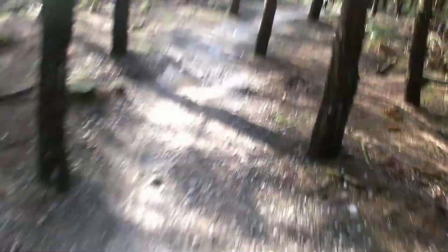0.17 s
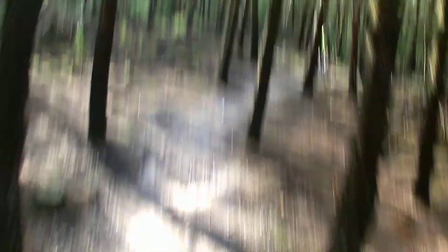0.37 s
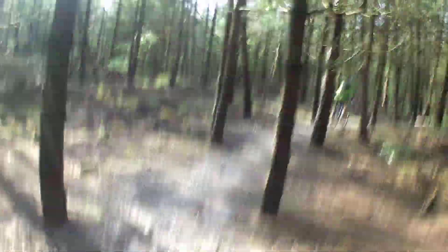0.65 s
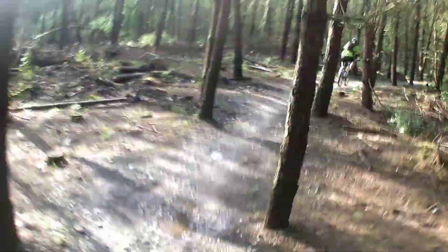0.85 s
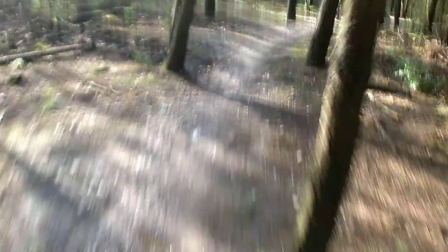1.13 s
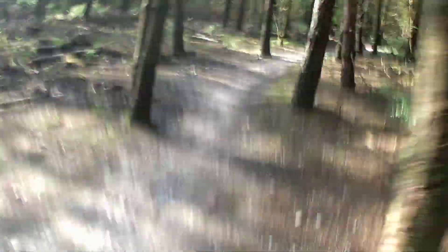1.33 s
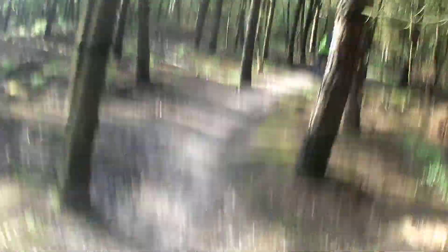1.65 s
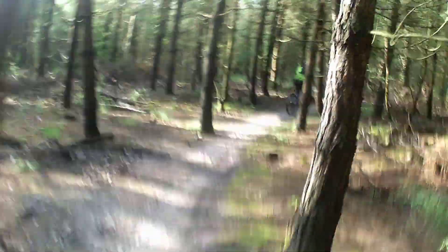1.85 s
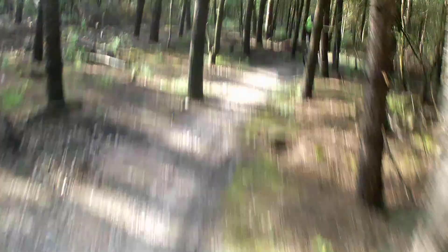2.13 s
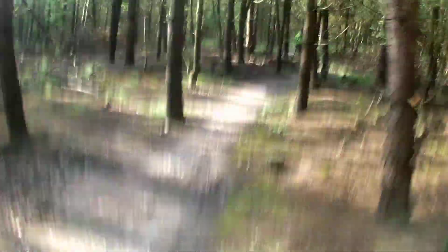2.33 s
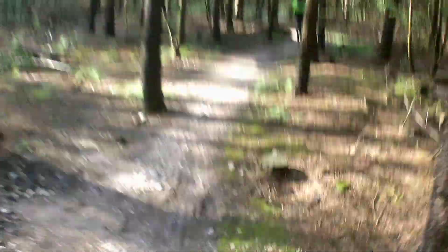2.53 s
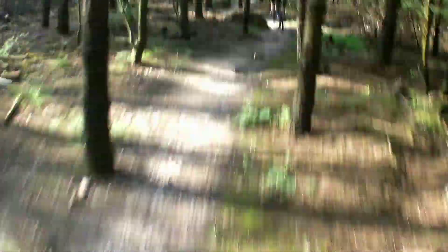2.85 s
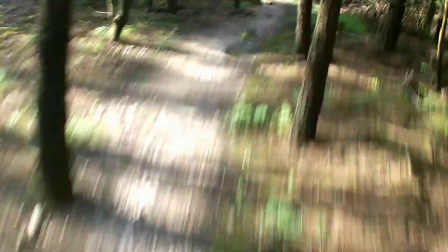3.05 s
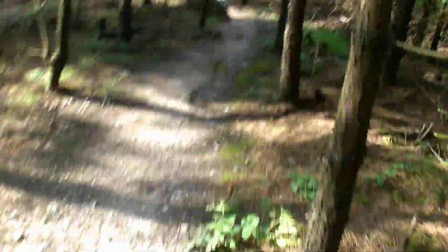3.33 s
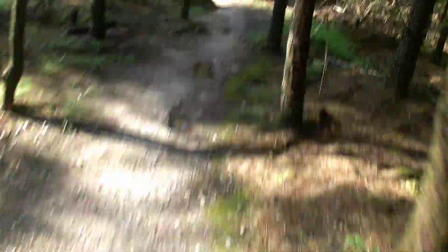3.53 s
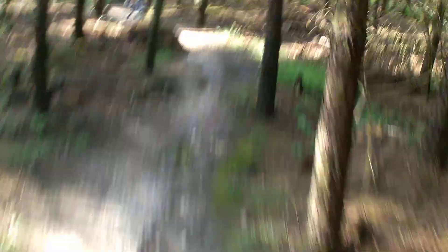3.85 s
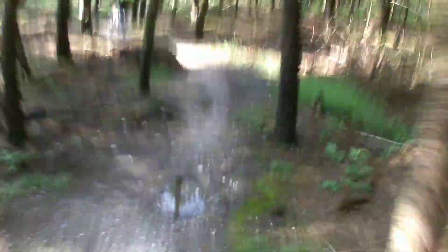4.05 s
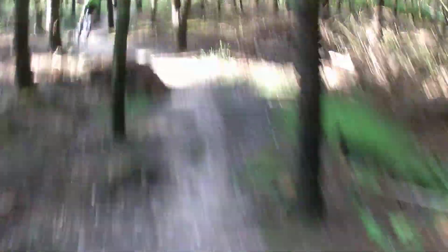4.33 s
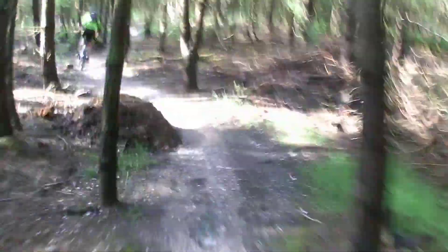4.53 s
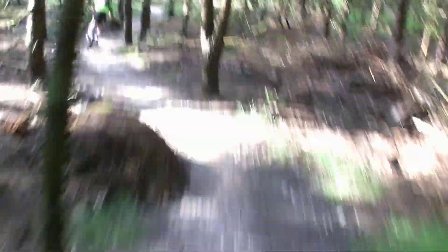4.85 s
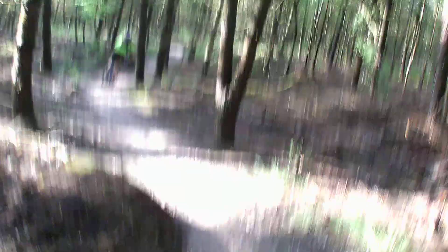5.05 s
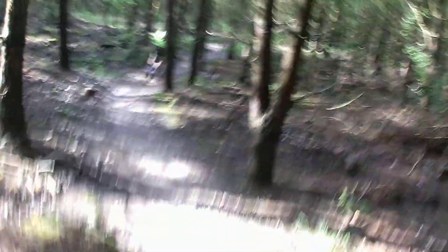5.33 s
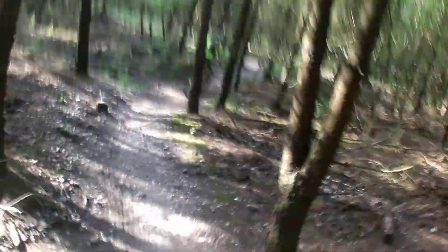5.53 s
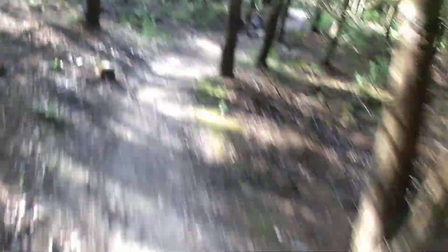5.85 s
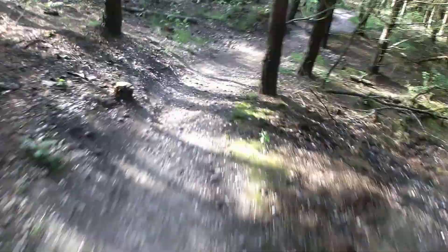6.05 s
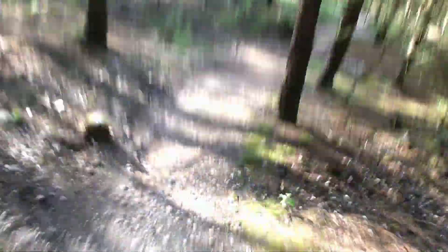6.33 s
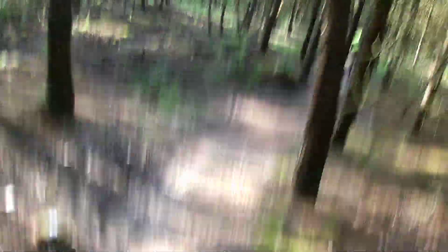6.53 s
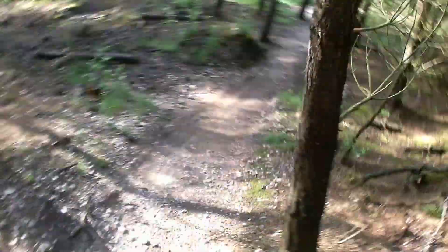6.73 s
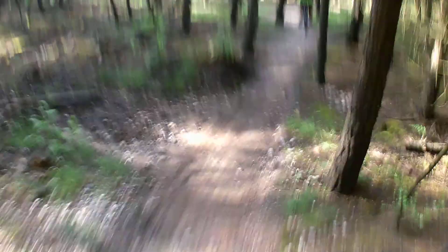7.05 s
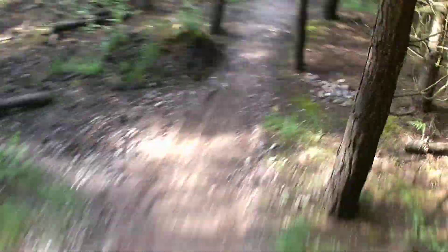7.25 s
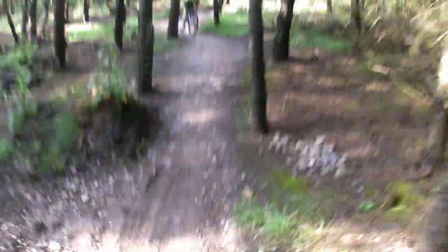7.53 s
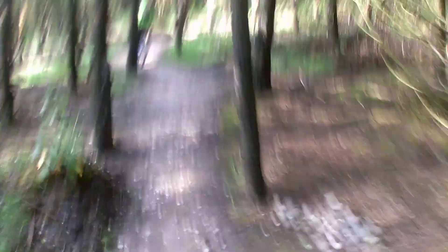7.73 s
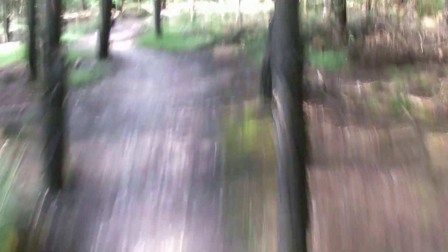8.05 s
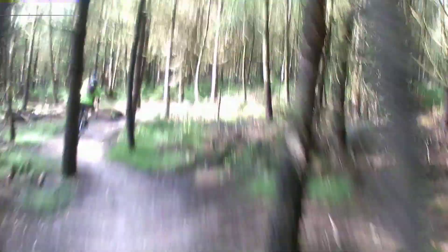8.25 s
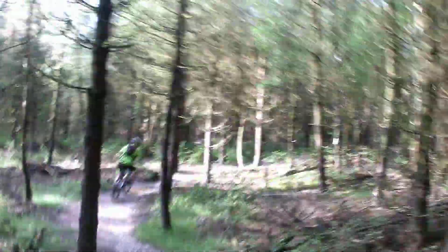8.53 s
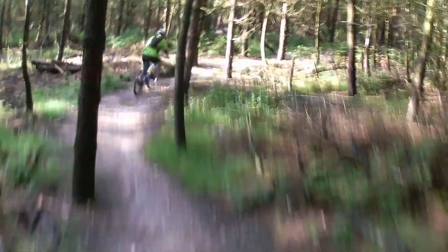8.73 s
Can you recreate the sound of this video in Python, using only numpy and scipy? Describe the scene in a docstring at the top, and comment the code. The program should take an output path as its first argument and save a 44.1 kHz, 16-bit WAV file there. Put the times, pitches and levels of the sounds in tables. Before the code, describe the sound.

Dry plastic clacks and low, wobbling thumps in irregular bursts from a bike-mounted camera on a bumpy dirt path, over faint tyre shudder and hiss.

```python
"""A small camera in a plastic case rides on the mount of a mountain bike over a rough trail, for 9 s.
It opens in a volley of knocks: shell and lid ring briefly, the mount wobbles low, the rig lurches.
From about 1 s the knocks come further apart; after 5.5 s they crowd in again up to the hard end.
Filtered random impacts give the tyre shudder throughout, shaped noise the microphone hiss. Faint
freewheel ticks, rung by a train of clicks, are strongest around 8 s."""
import sys
import numpy as np
from scipy import signal
from scipy.fft import rfft, irfft
from scipy.io import wavfile

SR = 44100
rng = np.random.default_rng(int(sys.argv[2]) if len(sys.argv) > 2 else 0)


def store_wav(level_fs):
    """Save 16-bit WAV to argv[1]."""
    pcm = np.round(np.clip(np.atleast_2d(level_fs), -1, 1) * 32767)
    wavfile.write(sys.argv[1], SR, pcm.T.astype(np.int16))


N = 392049

# case hits clamp: start_s, shell_db, lid_db, wobble_db (strengths of the blow on each part), wobble_hz
CLAMP_KNOCKS = [(0.0653, -47, -64, -21, 108), (0.0702, -40, -52, -15, 164), (0.0856, -32, -46, -17.5, 123),
                (.0923, -16, -27.5, -6.5, 147), (0.1287, -48, -63, -26, 100), (.1464, -19, -28, -7.5, 166),
                (0.1575, -27, -25.5, -7, 207), (0.1663, -44, -35, -12.5, 183),
                (0.3424, -56, -69, -27.5, 149), (0.4618, -42.5, -68.5, -23, 172),
                (0.5016, -47, -66, -23.5, 185), (.5733, -44, -53, -25.5, 209), (0.5792, -47, -40, -48, 150),
                (0.6014, -23.5, -31.5, -9, 170), (0.6388, -43, -63, -19.5, 127), (.652, -37, -53, -48, 150),
                (0.7188, -22.5, -60, -15.5, 220), (0.7272, -24, -23, -12, 197),
                (0.7948, -65, -72, -21, 140), (0.8256, -25, -34.5, -14.5, 174),
                (0.9391, -42.5, -63, -26, 168), (0.9517, -52, -62, -18.5, 185.5),
                (0.9649, -46, -45.5, -36, 148), (.9867, -55, -44, -31.5, 164), (1.1261, -57, -47, -48, 122),
                (1.1635, -24, -32, -18.5, 154), (1.18, -40, -55, -21.5, 160),
                (1.3665, -22.5, -32, -10.5, 188), (1.588, -28, -38.5, -16, 172.5),
                (1.7019, -22.5, -31.5, -17, 229), (1.7164, -46, -56, -24, 193),
                (1.728, -58, -56, -21.5, 194), (1.7794, -46.5, -65, -21.5, 117),
                (1.9365, -21.5, -30.5, -9, 188), (2.105, -72, -74, -27, 140),
                (2.1252, -34.5, -47.5, -21.5, 176), (2.2328, -64, -75, -24.5, 99),
                (2.2512, -21, -31.5, -9, 183.5), (2.3262, -45, -53, -20.5, 131),
                (2.3566, -42, -42, -19.5, 117), (2.3721, -21.5, -30, -9, 186), (2.5147, -62, -66, -19, 132),
                (2.5188, -49, -54, -17.5, 110), (2.5259, -43.5, -54, -21, 115),
                (2.5591, -35.5, -49.5, -21.5, 170), (2.9415, -43, -48, -37, 114),
                (2.972, -40, -46.5, -20.5, 117), (3.0154, -25, -36.5, -14.5, 205),
                (3.0983, -58, -70, -30, 141), (3.125, -53, -72, -26, 162), (3.218, -61, -69, -27, 169),
                (3.2388, -56, -63.5, -26, 162), (3.251, -50, -66, -57, 130),
                (3.746, -46.5, -41, -33.5, 184), (3.7929, -26, -36, -15, 185), (3.934, -59, -68, -31, 133),
                (3.955, -50, -60, -27, 164), (4.0914, -53, -52, -35, 174), (4.244, -51, -52, -34.5, 128),
                (4.2627, -40, -50.5, -21.5, 172), (4.562, -71.5, -82, -32, 150),
                (4.6133, -49, -44, -38, 187), (5.098, -51, -59.5, -34, 147), (5.1206, -26, -35.5, -13, 167),
                (5.319, -60, -72, -29.5, 147), (5.378, -23, -33, -12.5, 173.4),
                (5.539, -54.5, -61, -12, 143.6), (5.619, -28, -37, -16.5, 165),
                (5.6405, -48, -46, -37, 176), (5.6954, -52.5, -61, -20, 137), (5.7179, -44, -49, -28, 116),
                (5.74, -20, -28.5, -8.5, 167), (5.756, -66, -71, -17, 194.5),
                (5.9693, -56, -65.5, -31.5, 159), (5.9914, -56, -62, -30, 140),
                (6.0444, -31.5, -24, -14.5, 170), (6.0474, -18, -32, -7, 172), (6.063, -47, -57, -18, 193),
                (6.085, -44.5, -62, -28, 169), (6.203, -51, -67.5, -26, 138), (6.219, -49, -54, -26, 109),
                (6.2323, -33.5, -39.5, -17.5, 141), (6.3134, -30, -41, -19.5, 177),
                (6.472, -55.5, -64, -32.5, 138), (6.576, -62, -63, -27, 181), (6.5924, -20, -26, -9, 213),
                (6.601, -42, -42, -14, 199), (6.617, -45, -45, -32, 180), (6.629, -57, -62, -24, 102),
                (6.7232, -58, -70, -31.5, 139), (6.77, -59, -64, -34.5, 179),
                (6.8035, -56, -62, -32.5, 167), (7.0513, -51, -72, -30.5, 144), (7.0883, -52, -58, -24, 96),
                (7.1025, -20, -28, -12.5, 183), (7.156, -64, -78, -18.5, 138),
                (7.2128, -27, -39, -13.5, 192), (7.335, -48.5, -63, -20.5, 146),
                (7.35, -38.5, -45, -21.5, 117), (7.3867, -22, -30, -14.5, 186),
                (7.4415, -48, -51, -28, 155), (7.4563, -39, -35.5, -19.5, 112),
                (7.5324, -29.5, -40.5, -16.5, 173), (7.583, -58, -57, -33, 142),
                (7.7507, -48, -48, -29, 140), (7.82, -21.5, -32.5, -9.5, 192), (7.879, -54, -59, -37, 180),
                (7.913, -61, -73, -28, 135), (7.9746, -46.5, -47.5, -31, 168),
                (8.025, -19, -27.5, -13, 138), (8.045, -58, -71, -12, 195), (8.1372, -67, -70.5, -23, 154),
                (8.171, -57, -68, -22, 155), (8.3451, -55, -49.5, -33, 181),
                (8.4627, -29.5, -37, -17.5, 163), (8.5537, -67, -74, -23.5, 127),
                (8.5972, -36, -48, -20.5, 171), (8.63, -50, -60.5, -26.5, 151), (8.66, -45, -52, -35, 150),
                (8.6676, -16, -22, -11, 126), (8.7163, -58, -66, -23, 104), (8.7316, -13.5, -29, -5, 138),
                (8.739, -19.5, -21, -2.5, 235.7), (8.761, -51, -48, -18, 185),
                (8.794, -49.5, -46, -32, 141)]
# modes of the case shell: pitch_hz, relative_db, t60_s
SHELL_MODES = [(312, 2.5, 0.011), (583, -0.5, 0.01), (855, 2, 0.015), (1181, 1, 0.017), (1565, -6, 0.027),
               (1950, -47, 0.0053)]
# modes of the case lid: pitch_hz, relative_db, t60_s
LID_MODES = [(2520, 1, .017), (2740, 1, .019), (3260, -17, .016), (3680, -17, .02)]

HARD_DB = -32   # a shell level above this is a hard blow: it ticks and bounces


def from_db(db):
    """Decibels to amplitude."""
    return 10 ** (np.asarray(db) / 20)


def rms_one(x):
    """Scale a signal to rms 1."""
    return x / np.sqrt(np.mean(x ** 2) + 1e-20)


def filtered(x, order, hz, kind):
    """Butterworth filter: "low", "high" or "band"."""
    return signal.sosfilt(signal.butter(order, hz, kind, fs=SR, output="sos"), x)


def drift(rate_hz):
    """Slow chance: noise through a double one-pole low-pass, spread 1."""
    r = np.exp(-2 * np.pi * rate_hz / SR)
    noise = rng.standard_normal(N + SR)
    settled = signal.lfilter([1], [1, -2 * r, r * r], noise)[SR:]
    return rms_one(settled)


def ring(force, hz, t60_s):
    """A resonator: a unit click sets a decaying sine of height 1 ringing."""
    r = from_db(-60 / (t60_s * SR))
    w = 2 * np.pi * hz / SR
    return signal.lfilter([0, np.sin(w)], [1, -2 * r * np.cos(w), r * r], force + 1e-18)


def body(force, modes):
    """All modes of one part driven by the same force; neighbours move in opposite phase."""
    return sum((-1) ** k * from_db(level_db) * ring(force, hz, t60_s)
               for k, (hz, level_db, t60_s) in enumerate(modes))


def clicks(times_s, size):
    """A train with one impulse at each time."""
    out = np.zeros(N)
    at = np.clip((np.asarray(times_s) * SR).astype(int), 0, N - 1)
    np.add.at(out, at, size)
    return out


def click_fade(times_s, level_db, t60_s):
    """Exponential envelopes that start at each time and add where they overlap."""
    fade = from_db(-60 / (t60_s * SR))
    return signal.lfilter([1], [1, -fade], clicks(times_s, from_db(level_db)))


def grains(per_s, spread_db):
    """Random tiny impacts of uneven size and sign; rms 1."""
    size = from_db(spread_db * np.minimum(rng.exponential(1, N), 5))
    sign = rng.choice([-1, 1], N)
    lands = rng.random(N) < per_s / SR
    return rms_one(size * sign * lands)


def knocks():
    """Shell and lid ring at fixed modes; the mount's wobble pitch depends on how the clamp is loaded."""
    start_s, shell_db, lid_db, wobble_db, wobble_hz = all_blows()
    shell = struck(start_s, shell_db, SHELL_MODES, chatter_db=-27.5, mode_factor=0.92)
    shell = filtered(shell, 4, 1970, "low")   # plastic contact is soft
    # the opposed pair beats: it swells after the blow
    lid = struck(start_s, lid_db, LID_MODES, chatter_db=-30.5, mode_factor=-1.043)
    lid = filtered(lid, 2, [2250, 4300], "band")
    mount = mount_wobble(start_s, shell_db, wobble_db, wobble_hz)
    return shell + lid + filtered(mount, 2, 1700, "low")


def all_blows():
    """The listed knocks, a bounce with hardly any push after each hard one, a light nudge near every knock."""
    BOUNCE_S, BOUNCE_SHELL_DB, BOUNCE_LID_DB, BOUNCE_WOBBLE_DB = 0.019, -33.5, -21, -60   # against the blow
    NUDGE_MAX_DB, NUDGE_SPREAD_DB = -35.5, 5.5   # ceiling of the middle wobble level, and spread around it
    NUDGE_SHELL_DB, NUDGE_LID_DB = -20, -32.5   # against the nudge's wobble
    NUDGE_HZ, NUDGE_WITHIN_S = 153.6, .03   # middle wobble pitch; spread around the knock's time

    rows = np.array(CLAMP_KNOCKS)
    hard = rows[rows[:, 1] > HARD_DB]
    uneven = rng.normal(0, 1, (len(hard), 3)) * [.003, 3, 3]   # spread: s, shell dB, lid dB
    bounces = hard.copy()
    bounces[:, :3] += uneven + [BOUNCE_S, BOUNCE_SHELL_DB, BOUNCE_LID_DB]
    bounces[:, 3] += BOUNCE_WOBBLE_DB

    chance = rng.normal(0, 1, (len(rows), 5))
    start_s = np.abs(rows[:, 0] + NUDGE_WITHIN_S * chance[:, 4])
    push_db = np.minimum(NUDGE_MAX_DB, rows[:, 3] - 8) + NUDGE_SPREAD_DB * chance[:, 0]
    shell_db = push_db + NUDGE_SHELL_DB + 4 * chance[:, 1]
    lid_db = push_db + NUDGE_LID_DB + 6 * chance[:, 2]
    wobble_hz = NUDGE_HZ * (1 + .18 * chance[:, 3])
    nudges = np.c_[start_s, shell_db, lid_db, push_db, wobble_hz]
    return np.vstack([rows, bounces, nudges]).T


def struck(times_s, blow_db, modes, chatter_db, mode_factor):
    """Each blow meets every mode with a strength of its own, then the loose fit chatters on for a moment."""
    VARY_DB, CHATTER_T60_S = 1.5, 0.045   # spread of mode strengths between hard blows; chatter decay

    # light blows land anywhere: more varied colour
    glancing = np.clip((-25 - blow_db) / 10, 1, 3.5)[:, None]
    vary_db = glancing * rng.normal(0, VARY_DB, (len(times_s), len(modes)))
    out = np.zeros(N)
    for k, (hz, level_db, t60_s) in enumerate(modes):
        force = clicks(times_s, from_db(blow_db + level_db + vary_db[:, k]))
        out += mode_factor ** k * ring(force, hz, t60_s)

    loose = from_db(chatter_db) * click_fade(times_s, blow_db, CHATTER_T60_S)
    for mode in modes:   # every mode picks up its own small contacts
        out += body(loose * grains(600, 3.1), [mode])
    return out


def mount_wobble(start_s, shell_db, wobble_db, wobble_hz):
    """Each push sets off a decaying low sine, less one smooth recoil pulse."""
    WOBBLE_T60_S, WOBBLE_RISE_S = 0.069, 0.00072   # decay; shortest rise
    RECOIL_DB, RECOIL_S = -9.5, 0.0019   # peak against the wobble, before the rise; time of that peak

    mount, t = np.zeros(N), np.arange(SR // 8) / SR
    # a push without a crack starts slowly
    rise_s = WOBBLE_RISE_S * from_db(np.clip(wobble_db - shell_db - 25.0, 0, 16))
    # the case is thrown back once
    recoil = from_db(RECOIL_DB) * t / RECOIL_S * np.exp(1 - t / RECOIL_S)
    for at, level_db, hz, slow_s in zip((start_s * SR).astype(int), wobble_db, wobble_hz, rise_s):
        swing = from_db(-60 * t / WOBBLE_T60_S) * np.sin(2 * np.pi * hz * t + 0.48)
        wobble = (1 - np.exp(-t / slow_s)) * (swing - recoil)
        mount[at:at + len(t)] += from_db(level_db) * wobble[:N - at]
    return mount


def snaps():
    """Millisecond scrapes of bright noise that also ring the hard edge."""
    # the hardest edge-on contacts, a bright tick: start_s, level_db (of the noise, before the high-pass)
    edge_contacts = [(.0933, -32.5), (0.1565, -40), (0.168, -46), (0.7285, -42), (0.736, -49),
                     (3.7926, -51), (5.378, -55), (6.045, -42.5), (6.0833, -49.5), (6.5914, -40),
                     (6.602, -53), (6.613, -43.5), (8.0346, -50), (8.0495, -54), (8.7302, -51),
                     (8.7402, -25.5), (8.7481, -22), (8.7563, -52), (8.7617, -46)]
    # modes of the hard edge: pitch_hz, relative_db, t60_s
    edge_modes = [(3820, 4.5, 0.015), (4860, 4.5, 0.0087), (7020, -16, 0.032), (9060, -24, 0.012)]
    TICK_DELAY_S, TICK_DB = 0.0017, -31   # tick after each hard knock, level against its shell level

    ticks = [(start_s + TICK_DELAY_S, shell_db + TICK_DB)
             for start_s, shell_db, *_ in CLAMP_KNOCKS if shell_db > HARD_DB]
    start_s, level_db = np.vstack([edge_contacts, ticks]).T
    burst = click_fade(start_s, level_db, 0.0069) * rng.standard_normal(N)
    edge = from_db(-17.5) * body(burst, edge_modes)
    return filtered(burst + edge, 2, 3400, "high")


def jolts():
    """The rig lurches: one soft swing out and back, a low cosine under a bell curve centred on the bump."""
    # lurches on bumps: centre_s, level_db, swing_hz, length_s (from the centre until 53 dB down)
    lurches = [(0.058, -38, 27, 0.028), (0.179, -20.5, 49, 0.047), (.386, -40, 15, 0.021),
               (0.472, -36, 30, 0.025), (0.537, -31, 23, .053), (0.663, -35, 75, 0.056),
               (0.752, -25, 46, .014), (0.879, -32, 33, .021), (0.981, -21.5, 32, 0.025),
               (1.123, -34, 42, 0.012), (1.191, -18.5, 32, 0.033), (1.415, -27.5, 44, 0.042),
               (1.525, -42, 39, 0.021), (1.733, -17, 43, 0.031), (1.976, -26.5, 43, 0.028),
               (2.203, -37, 28, 0.012), (2.411, -25, 40, 0.044), (2.625, -28.5, 28, 0.018),
               (2.826, -34.5, 24, 0.056), (2.943, -34, 47, 0.01), (3.06, -34, 50, .041),
               (3.253, -24.5, 44, .042), (3.528, -38, 21, 0.034), (3.646, -38, 38, 0.011),
               (3.714, -37, 35, .031), (3.749, -33, 72, .016), (3.991, -40, 39, .032),
               (4.132, -32.5, 30, 0.0075), (4.194, -39, 26, .021), (4.514, -39, 37, 0.022),
               (4.615, -41, 27, 0.019), (4.833, -34, 16, 0.024), (5.155, -36, 23, 0.018),
               (5.27, -35.5, 14, 0.049), (5.415, -27.5, 30, 0.046), (5.778, -24.5, 33, 0.027),
               (5.985, -35, 84, 0.025), (6.031, -31.5, 120, .016), (6.071, -17, 34, 0.031),
               (6.355, -36, 26, .024), (6.518, -32.5, 30, 0.03), (6.617, -14, 54, 0.035),
               (6.665, -30, 46, 0.014), (6.83, -35.5, 27, 0.04), (6.955, -34.5, 24, 0.012),
               (7.125, -24, 35, .025), (7.183, -30, 18, 0.012), (7.239, -27, 29, .022),
               (7.354, -31, 56, 0.037), (7.417, -25.5, 35, 0.033), (7.616, -29, 21, 0.019),
               (7.855, -22, 33, 0.021), (7.95, -39, 24, 0.013), (7.97, -27.5, 52, 0.014),
               (8.047, -15.5, 48, 0.042), (8.2, -33, 26, 0.021), (8.35, -38, 77, 0.02),
               (8.76, -16.5, 53, 0.044)]

    pad = SR // 2   # room for swings that overlap the ends
    out, t = np.zeros(N + SR), np.arange(-SR // 8, SR // 8) / SR
    for centre_s, level_db, hz, length_s in lurches:
        at = int(centre_s * SR) + pad - SR // 8
        bell = np.exp(-(2.47 * t / length_s) ** 2)
        out[at:at + len(t)] += from_db(level_db) * bell * np.cos(2 * np.pi * hz * t)
    return out[pad:pad + N]


def shudder():
    """Lumpy sway, uneven small impacts into the mount and, in the same fits, finer ones into the case."""
    # tyre shudder through the frame, as the tremble of the mount: time_s, level_db (rms, before the fits)
    tremble_curve = [(0, -61.5), (.37, -61), (.74, -43.5), (.95, -51.5), (2.4, -53.5), (2.6, -59.5),
                     (4.3, -65), (4.9, -67), (5.588, -51), (5.8, -66), (6.46, -57.5), (7.05, -66.5),
                     (7.301, -60), (7.621, -59.5), (8, -45.5), (8.17, -59), (8.89, -53.5)]
    # modes of the mount: pitch_hz, relative_db, t60_s
    mount_modes = [(118, -6, 0.087), (203, 10, 0.027), (232, -8.5, 0.026)]
    SWAY_DB, BUZZ_DB = -50, -72.5   # at mean shudder, before the random drift
    SWAY_FOLLOWS, BUZZ_FOLLOWS = 0.45, 0.99   # share of the shudder's dB swing

    tremble_db = np.interp(np.arange(N) / SR, *np.transpose(tremble_curve))
    swing_db = tremble_db - tremble_db.mean()
    fits = np.clip(drift(6.6), -2, 1)

    sway = filtered(rng.standard_normal(N), 2, [14, 42], "band")
    sway_db = SWAY_DB + SWAY_FOLLOWS * swing_db + 1.1 * drift(6.6)

    tremble = filtered(body(grains(200, 3.6), mount_modes), 4, 260, "low")   # rubber contact: dull
    tremble_db = tremble_db + 5 * fits

    rattle = grains(430, 3.2)
    case = body(rattle, SHELL_MODES) + from_db(-6) * body(rattle, LID_MODES)
    buzz = filtered(case, 2, 3400, "low")
    buzz_db = BUZZ_DB + BUZZ_FOLLOWS * swing_db + 2.65 * fits + 0.83 * drift(25)

    return (from_db(sway_db) * rms_one(sway) + from_db(tremble_db) * rms_one(tremble)
            + from_db(buzz_db) * rms_one(buzz))


def freewheel():
    """Nearly evenly spaced pawl ticks; a second, short pass of each mode softens the attack."""
    # freewheel pawls ticking: time_s, drive_db (click strength, before its random spread)
    ratchet_curve = [(0, -90), (2.8, -87.5), (4.3, -104), (7.4, -102), (7.75, -81), (8.2, -81.5),
                     (8.4, -102)]
    TICKS_PER_S, PAWL_T60_S, SOFTEN_T60_S = 41.8, .028, 0.0038

    times_s = np.arange(.008, N / SR, 1 / TICKS_PER_S)
    drive_db = np.interp(times_s, *np.transpose(ratchet_curve)) + rng.normal(0, 1.8, len(times_s))
    ticks = clicks(times_s + rng.normal(0, .001, len(times_s)), from_db(drive_db))
    out = np.zeros(N)
    for hz, mode_db in [(10148, 0), (4480, -11)]:   # only two thin rings get through
        out += from_db(mode_db) * ring(ring(ticks, hz, PAWL_T60_S), hz, SOFTEN_T60_S)
    return out


def hiss():
    """Microphone noise coloured in the spectrum, with one thin wavering electronic tone."""
    # colour of the microphone noise: pitch_hz, relative_db (per Hz)
    noise_colour = [(180, -37), (300, -9), (405, -6.5), (530, -0.5), (1000, -18), (1240, -1.5),
                    (1420, -13.5), (2200, -17), (2600, -10), (3170, -17), (6000, -16.5), (13500, -13.5),
                    (15800, -14.5)]
    HISS_DB = -67   # rms before the swell
    WHINE_HZ, WHINE_DB = 14645, -82.5   # middle pitch; peak before the waver

    hz, level_db = np.transpose(noise_colour)
    bins_hz = np.arange(N // 2 + 1) * SR / N + 1   # 1 Hz up, to keep the log finite
    colour = from_db(np.interp(np.log(bins_hz), np.log(hz), level_db))
    noise = irfft(rfft(rng.standard_normal(N)) * colour, N)
    waver = from_db(WHINE_DB + 4.0 * drift(4))
    whine = waver * np.sin(2 * np.pi * WHINE_HZ * np.arange(N) / SR + drift(4))
    swell = from_db(1.1 * drift(5) + 1.2 * drift(14))   # the hiss comes and goes a little
    return from_db(HISS_DB) * swell * rms_one(noise) + whine


def scene():
    """All parts reach the one microphone through the case."""
    return (knocks() + snaps() + jolts() + shudder() + freewheel() + hiss())[None, :]


def record(dry):
    """The input blocks the slowest swings, the hardest blows overload, the top is cut."""
    CLIP_TOP, CUTOFF_HZ = .7, 16050   # full scale is 1; 60 dB down from the cutoff up
    coupled = filtered(dry, 1, 14, "high")
    overloaded = np.clip(coupled, -CLIP_TOP, CLIP_TOP)
    return signal.sosfilt(signal.cheby2(24, 60, CUTOFF_HZ, fs=SR, output="sos"), overloaded)


dry = scene()
out = record(dry)
store_wav(out)
```